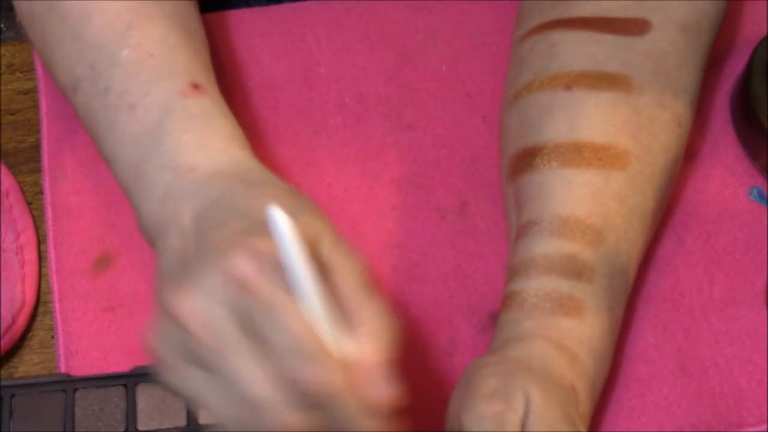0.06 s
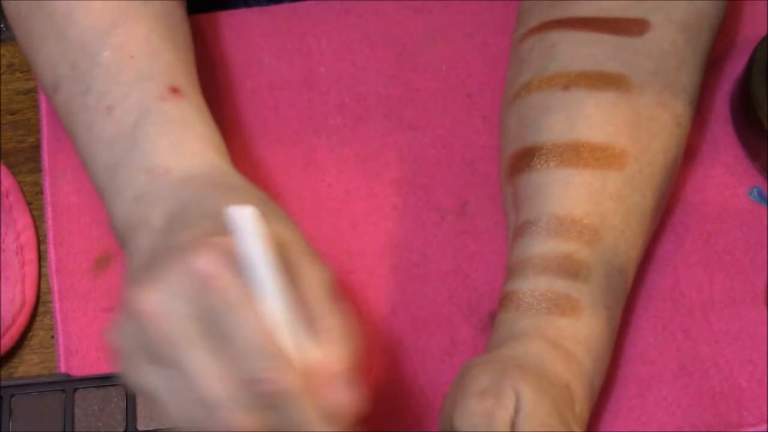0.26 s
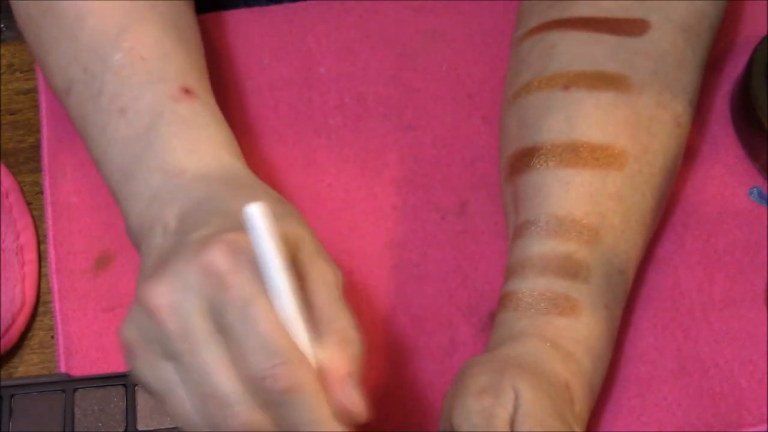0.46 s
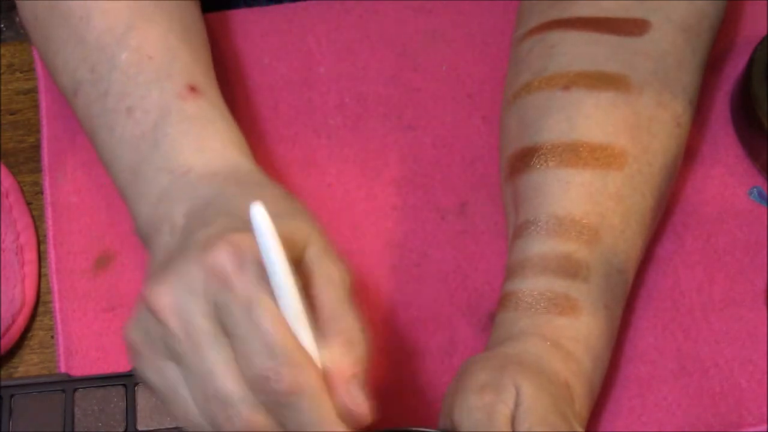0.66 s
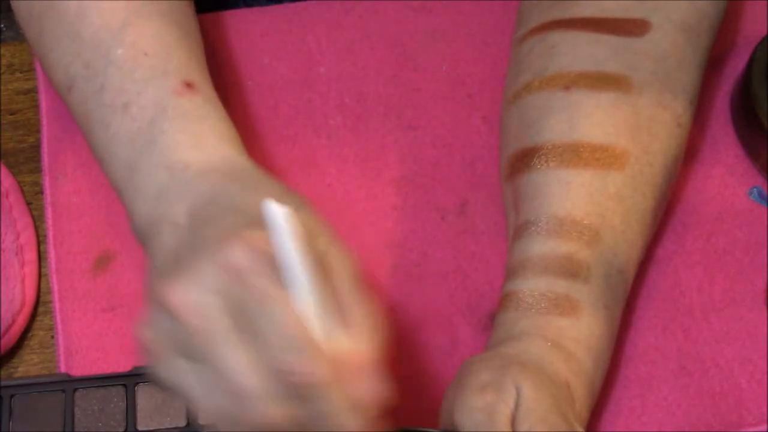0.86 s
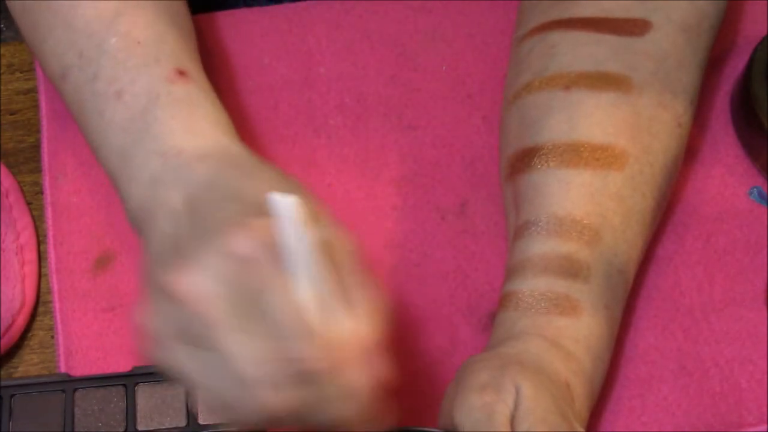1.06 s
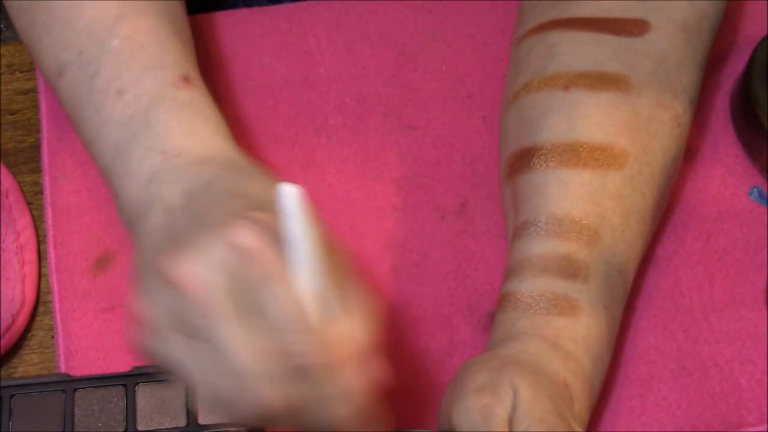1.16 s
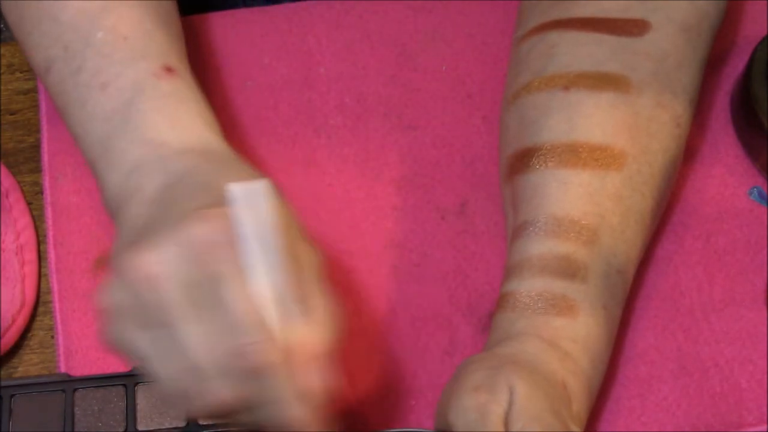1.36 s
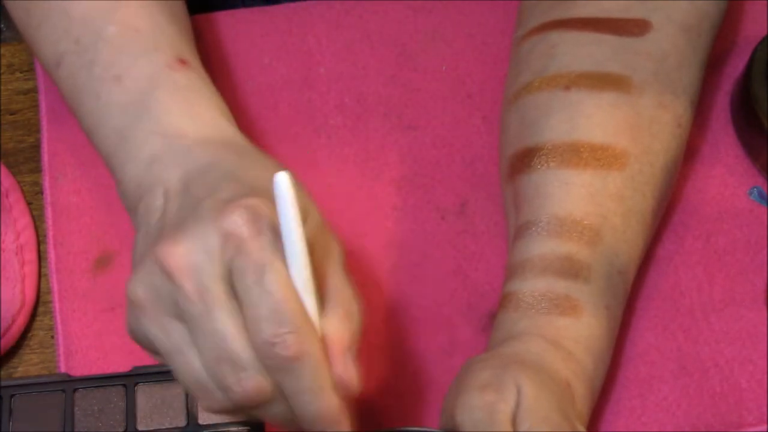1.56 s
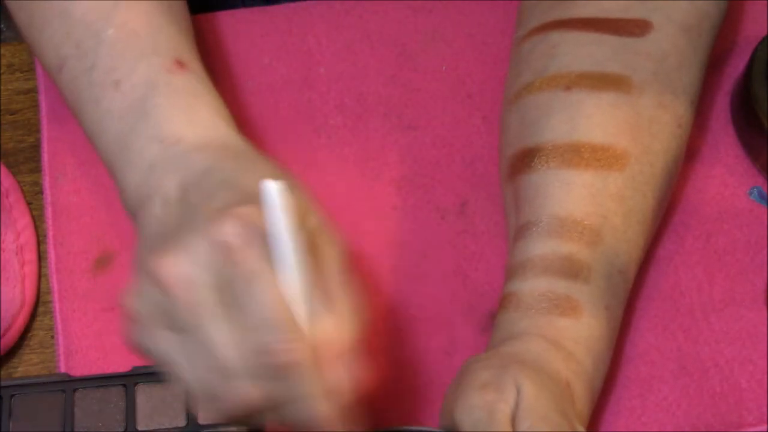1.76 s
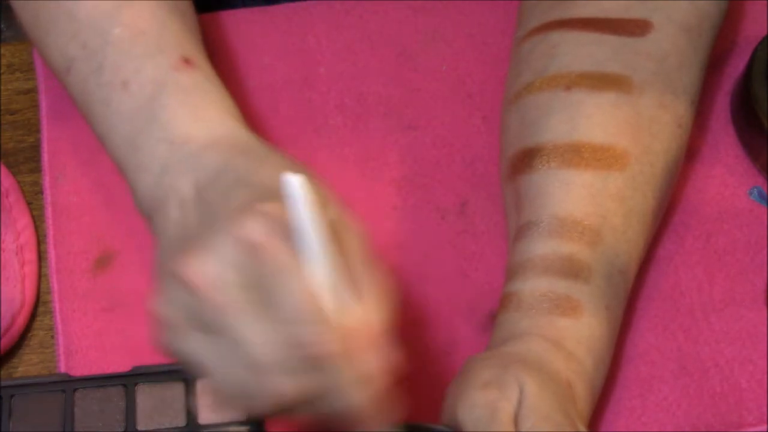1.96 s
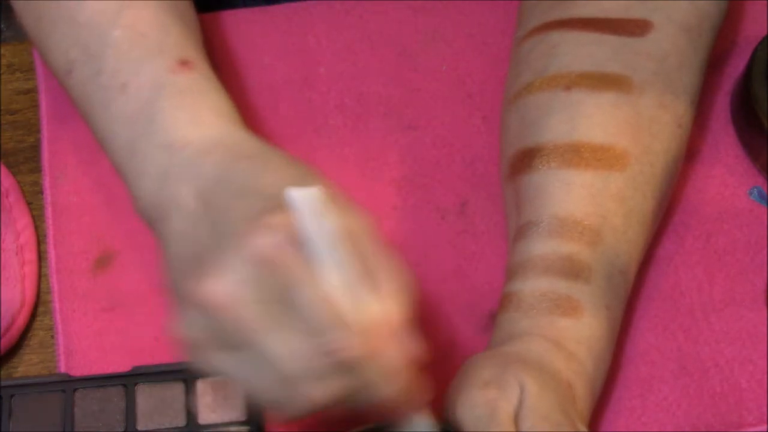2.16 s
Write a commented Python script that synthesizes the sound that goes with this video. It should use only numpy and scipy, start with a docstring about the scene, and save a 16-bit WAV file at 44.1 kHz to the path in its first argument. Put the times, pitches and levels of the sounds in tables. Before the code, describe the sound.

A small brush knocks a plastic palette with short, dry clacks: the tail of one at the start, a loud one at 0.2 seconds, a duller-bodied but bright one at 0.7, a faint tip tick at 1.1, then strong knocks at 1.3, 1.45 and 1.7, and a softer one at 1.9. Faint scratchy strokes rub felt about nine times a second over steady low motor hum and rushing air in a small room.

```python
"""Brush on a felt mat

In a small room a little brush sweeps to and fro over felt about nine times a second: clicks of slipping
bristles, a smooth rub and a hollow mat ring. Its handle knocks a plastic palette now and then (a noise crack
and damped modes, with echoes and a tail), its tip ticks once, lightly. Around it a motor hums in wavering
sine tones and air rushes as shaped noise. Mid and side signals make the stereo picture."""
import sys
import numpy as np
from scipy import signal
from scipy.fft import rfft, irfft
from scipy.io import wavfile
from scipy.ndimage import uniform_filter1d

SR = 44100
rng = np.random.default_rng(int(sys.argv[2]) if len(sys.argv) > 2 else 0)


def unload_audio(sound):
    """Save the sound as a 16-bit wav file, at the path given as the first command line argument."""
    columns = np.transpose(np.atleast_2d(sound))
    # keep every value between -1 and 1, then stretch to whole-number steps
    steps = np.round(np.clip(columns, -1, 1) * 32767)
    wavfile.write(sys.argv[1], SR, steps.astype(np.int16))


def level_to_linear(level):
    """Convert decibel levels to linear amplitude factors, elementwise."""
    exponent = np.asarray(level, float) / 20
    return 10 ** exponent


N = 97020  # length in samples

# Handle knocks on the palette. Each row: start in seconds, level in dB, then shifts in dB of the low, upper,
# bright and treble mode groups (treble also shifts the crack), contact in seconds.
KNOCKS = [(-.022, -16.5, 3, -4, -11, -11, 0.0023), (0.2204, -9, -1, 2.5, -4, 2, 0.0026),
          (.675, -12.5, 4.5, -3, 6.5, 2.5, .0018), (1.3297, -10.5, 1, 3.5, 4.5, 3, 0.002),
          (1.4491, -9.5, -7, -1.5, -3, -3, 0.00104), (1.6755, -10.5, -13, -1.5, -5, 1, 0.00179),
          (1.8991, -21, -5.5, -3, -12, -7, 0.0013), (1.0055, -50, -6, -3, -2, 13, .0005),
          (1.1085, -45, 1, -5, -4, 0, .0005)]
# Borders in Hz between the low, unshifted, upper, bright and treble mode groups.
MODE_GROUP_EDGES = [1700, 3400, 5000, 6200]
# Modes of the plastic palette. Each row: nominal frequency in Hz, relative level in dB, 60 dB decay in seconds.
PALETTE_MODES = [(883, -12.5, 0.0059), (1274, 1, 0.0048), (1500, -9, 0.0066), (2155, -1.5, 0.0059),
                 (2740, -3.5, 0.0057), (3094, -15, 0.032), (3510, -9.5, 0.0034), (4122, -5.5, 0.01),
                 (4560, -3, 0.0094), (5444, -5, .012), (6880, -10, 0.0017), (7170, -13, 0.015),
                 (8770, -14, 0.013), (9610, -11.5, 0.015), (10700, -8.5, 0.0052), (12570, -10.5, 0.0041),
                 (14590, -21, 0.0032)]
# Reflections from near surfaces. Each row: delay in seconds, level in dB.
NEAR_ECHOES = [(.0073, -18), (.0102, -18), (.0128, -26.5), (0.0186, -24)]
# Reverberation of the small room. Each row: frequency in Hz, 60 dB decay in seconds.
ROOM_DECAY = [(500, 0.26), (1300, 0.14), (3500, 0.18), (6000, 0.17), (9000, 0.14), (15000, 0.13)]
# Brush strokes. Each row: time of full speed in seconds, level in dB, length in seconds.
BRUSH_STROKES = [(-.01, -48.5, 0.095), (0.092, -45.5, 0.073), (0.236, -46.5, .1), (0.319, -44.5, 0.071),
                 (0.439, -50, 0.062), (.54, -46, 0.073), (0.658, -50.5, 0.073), (0.761, -48, 0.077),
                 (0.883, -48.5, 0.097), (.985, -46, 0.071), (1.088, -50.5, 0.096), (1.214, -48.5, .13),
                 (1.337, -52.5, 0.093), (1.45, -45.5, 0.11), (1.561, -52, 0.055), (1.684, -46, 0.11),
                 (1.778, -48.5, 0.064), (1.878, -48.5, 0.078), (1.988, -51, 0.085), (2.095, -46, 0.071),
                 (2.21, -50.5, 0.062)]
# Spectrum of bristles on felt. Each row: frequency in Hz, relative density in dB per Hz.
BRISTLE_SPECTRUM = [(500, -16.5), (900, -12), (1200, -2.5), (1450, -7), (1750, -8.5), (2300, -13.5),
                    (3000, -10), (4500, -16), (6200, -17), (7400, -13), (9200, -13.5), (10000, -19),
                    (12500, -20), (15000, -28), (17000, -37)]
# Spectrum of the rushing air. Each row: frequency in Hz, relative density in dB per Hz.
AIR_SPECTRUM = [(30, -45), (55, -29), (80, -15.5), (105, -5), (150, 3), (220, 1), (330, -7), (400, -3.5),
                (500, -6.5), (720, -3), (950, -12), (1400, -13.5), (2000, -19), (3000, -25.5),
                (4500, -27.5), (7000, -32), (10000, -34.5), (13000, -40), (16000, -53)]
# Width of the air. Each row: frequency in Hz, side level against mid in dB.
AIR_WIDTH = [(60, -12), (130, -33), (300, -14), (1300, -16), (3000, -9), (5500, -10.5), (7000, -23),
             (15000, -36)]
# Motor tones, the first two beating. Each row: frequency in Hz, rms level in dB, start phase in turns,
# rms waver in dB.
MOTOR_TONES = [(120, -46.3, 0., .6), (132.47, -54, .5, 1.5), (217, -58, 0., 3.), (240, -58, 0., 2.5),
               (399, -60, 0., 3.)]
# Spectrum of the knock's crack. Each row: frequency in Hz, relative density in dB per Hz.
CRACK_SPECTRUM = [(300, -18), (800, -20), (2000, 0), (5000, -3.5), (9000, -11), (15000, -29.5)]
# Light ticks of the brush tip. Each row: start in seconds, level in dB, frequency in Hz, 60 dB decay in seconds.
TIP_TICKS = [(1.108, -24, 1500, 0.021)]
# Colour of the side signal in the room. Each row: frequency in Hz, gain in dB.
ROOM_SIDE_COLOUR = [(500, 0), (1500, -6), (4500, 1), (8000, 1.5), (12000, 1), (16000, -8)]
# Colour of sound reflected by the walls. Each row: frequency in Hz, gain in dB.
WALL_COLOUR = [(800, 0), (1500, -2.5), (2500, 1), (3600, -4.5), (4600, 0), (5600, -1.5), (6500, -8.5),
               (10000, -6), (15000, -13)]
# Share of the mid that leans to the right. Each row: frequency in Hz, gain in dB.
LEAN_TO_RIGHT = [(200, -36), (5000, -36), (8000, -60)]

ROOM_DB, ROOM_START_S, ROOM_SIDE_DB = -12, 0.004, -15.5  # side is relative to the mid tail
SPREAD_T60_S = 0.006  # fading of the burst that feeds the tail
RISE_CYCLES, HELD_BELOW_HZ = 0.83, 3440  # modes under this frequency are driven for the whole contact
DETUNE = 0.014  # random spread of the palette modes, as a share of their frequency
CRACK_DB, CRACK_T60_S, TAP_SIDE_DB = -2, 0.008, -23.5
RISE_SHARE = 0.63  # part of a stroke spent speeding up
SLIPS_PER_S, SLIP_SPREAD_DB, RUB_DB = 2500, 4.5, -0.5
RUB_ROOM_DB, RUB_SIDE_DB = -10.5, -34
SCUFF_HZ, SCUFF_WIDTH_HZ, SCUFF_DB, SCUFFS_PER_S = 1426, 390, -2.5, 500
AIR_DB, PATCH_DB = -46.5, 0.5  # patches: rms drift of level


def evened(x):
    """Scales to rms 1."""
    return x / np.sqrt(np.mean(x ** 2) + 1e-20)


def read(points, hz):
    """Reads a table on a log-frequency axis."""
    f, value = np.transpose(points)
    return np.interp(np.log(hz + 1), np.log(f + 1), value)


def coloured(x, points):
    """Filters x by a table of gains in dB over frequency."""
    gain = level_to_linear(read(points, np.fft.rfftfreq(len(x), 1 / SR)))
    return irfft(rfft(x) * gain, len(x))


def add(mix, s, sound):
    """Mixes a sound in at time s, which may lie before the start."""
    at = round(s * SR)
    sound = sound[max(-at, 0):]
    part = mix[max(at, 0):][:len(sound)]
    part += sound[:len(part)]


def room_tail():
    """Sparse reflections of random sign, each band dying at its own speed; scaled to energy 1."""
    taps = np.zeros(SR // 2)
    slots = np.arange(round(ROOM_START_S * SR), SR // 2 - 10, 10)
    signs = rng.choice([-1., 1.], SR)[:len(slots)]
    at = slots + rng.integers(0, 10, SR)[:len(slots)]
    taps[at] = signs
    hz, t, z = signal.stft(taps, SR, nperseg=128)
    decay = level_to_linear(-60 * t / read(ROOM_DECAY, hz)[:, None])
    tail = signal.istft(z * decay, SR, nperseg=128)[1]
    return tail / np.linalg.norm(tail)


def in_room(ring):
    """Direct sound with echoes and tail as mid and side; the tail is fed mostly by the first instant."""
    dull = coloured(ring, WALL_COLOUR)
    fade = level_to_linear(-60 * np.arange(len(dull)) / SR / SPREAD_T60_S)
    burst = evened(dull * fade) * np.std(ring)
    mid = level_to_linear(ROOM_DB) * signal.fftconvolve(burst, room_tail())
    add(mid, 0, ring)
    for delay_s, echo_db in NEAR_ECHOES:
        add(mid, delay_s, level_to_linear(echo_db) * dull)
    side = level_to_linear(ROOM_DB + ROOM_SIDE_DB) * signal.fftconvolve(burst, room_tail())
    add(side, 0.0001, level_to_linear(TAP_SIDE_DB) * ring)
    return mid, coloured(side, ROOM_SIDE_COLOUR)


def tap(level_db, low_db, upper_db, bright_db, treble_db, contact_s):
    """A crack, and modes driven while the handle touches (low ones longest) that then die away."""
    t = np.arange(2000) / SR
    hz, db, t60 = np.transpose(PALETTE_MODES)[:, :, None]
    group_db = np.array([low_db, 0, upper_db, bright_db, treble_db])
    db = db + group_db[np.searchsorted(MODE_GROUP_EDGES, hz)]
    held_s = contact_s * np.minimum(HELD_BELOW_HZ / hz, 1)
    free = np.maximum(t - held_s, 0)  # time since the mode was let go
    detuned_hz = hz * (1 + DETUNE * rng.standard_normal(hz.shape))
    turns = detuned_hz * t + rng.random(hz.shape)
    rise = np.sin(np.pi / 2 * np.minimum(t * hz / RISE_CYCLES, 1)) ** 2
    modes = (rise * level_to_linear(db - 60 * free / t60) * np.sin(2 * np.pi * turns)).sum(0)
    crack = evened(coloured(rng.standard_normal(len(t)), CRACK_SPECTRUM))
    crack_free = np.maximum(t - contact_s * 0.54, 0)
    ring = modes + crack * level_to_linear(CRACK_DB + treble_db - 60 * crack_free / CRACK_T60_S)
    ring = signal.sosfilt(signal.butter(3, 550, "high", fs=SR, output="sos"), ring)
    loudness = np.sqrt(np.sum(ring ** 2) / (0.004 * SR))  # energy as rms over 4 ms
    return in_room(level_to_linear(level_db) * ring / loudness)


def scuff():
    """Sparse catches of the brush ring the mat's hollow resonance."""
    catches = rng.standard_normal(N) * (rng.random(N) < SCUFFS_PER_S / SR)
    b, a = signal.iirpeak(SCUFF_HZ, SCUFF_HZ / SCUFF_WIDTH_HZ, SR)
    ring = signal.lfilter(b, a, signal.lfilter(b, a, catches))  # resonator run twice
    return level_to_linear(SCUFF_DB) * evened(ring)


def brush():
    """Bristles slip in tiny uneven clicks over a smooth rub, swelling with each stroke."""
    t, speed = np.arange(N) / SR, np.zeros(N)
    for s, level_db, length in BRUSH_STROKES:
        half = length * np.where(t < s, RISE_SHARE, 1 - RISE_SHARE)
        speed += level_to_linear(level_db) * np.exp(-2 * ((t - s) / half) ** 2)
    size = level_to_linear(SLIP_SPREAD_DB * np.minimum(rng.exponential(1, N), 5)) * rng.choice([-1, 1], N)
    slips = evened(size * (rng.random(N) < SLIPS_PER_S / SR))
    rub = level_to_linear(RUB_DB) * rng.standard_normal(N)
    close = speed * (evened(coloured(slips + rub, BRISTLE_SPECTRUM)) + scuff())
    mid_room, side_room = [signal.fftconvolve(close, room_tail())[:N] for _ in range(2)]
    side = level_to_linear(RUB_SIDE_DB) * coloured(side_room, ROOM_SIDE_COLOUR)
    return np.array([close + level_to_linear(RUB_ROOM_DB) * mid_room, side])


def air():
    """Rushing air: random short-time spectra with drifting patches, as mid and side."""
    frames, hz = N // 256 + 5, np.fft.rfftfreq(1024, 1 / SR)
    a, b, c, d, patches = rng.standard_normal((frames, 513, 5)).T
    patches = uniform_filter1d(patches, size=8, axis=0)  # smooth over frequency
    patches = evened(uniform_filter1d(patches, size=12, axis=1))  # smooth over time
    width = level_to_linear(read(AIR_WIDTH, hz))[:, None]
    z = np.array([a + 1j * b, (c + 1j * d) * width])
    z *= level_to_linear(read(AIR_SPECTRUM, hz)[:, None] + PATCH_DB * patches)
    out = signal.istft(z, nperseg=1024, noverlap=768)[1][:, :N]
    return level_to_linear(AIR_DB) * out / np.std(out[0])


def hum():
    """Motor hum: sine tones of fixed pitch whose level wavers slowly."""
    t, out = np.arange(N) / SR, np.zeros(N)
    for hz, db, turns, waver_db in MOTOR_TONES:
        rates_hz = np.geomspace(0.5, 8, num=12)
        waver = evened(sum(np.sin(2 * np.pi * (f * t + rng.random())) for f in rates_hz))
        tone = np.sqrt(2) * np.sin(2 * np.pi * (hz * t + turns))
        out += level_to_linear(db + waver_db * waver) * tone
    return out


def tick(level_db, hz, t60):
    """The brush tip sounds one damped mode with a soft start."""
    t = np.arange(2000) / SR
    onset = np.minimum(t / 0.0018, 1)
    return in_room(onset * level_to_linear(level_db - 60 * t / t60) * np.sin(2 * np.pi * hz * t))


def scene():
    """Sums everything as mid and side, then left and right."""
    mid, side = brush() + air()
    mid = mid + hum()
    events = [(tap, row) for row in KNOCKS] + [(tick, row) for row in TIP_TICKS]
    for source, (s, *settings) in events:
        event_mid, event_side = source(*settings)
        add(mid, s, event_mid)
        add(side, s, event_side)
    side = side - coloured(mid, LEAN_TO_RIGHT)
    return np.array([mid + side, mid - side])


def top_cut(x):
    """Nothing passes above the cut-off."""
    return signal.sosfilt(signal.butter(12, 16860, fs=SR, output="sos"), x)


def record(dry):
    """Soft overload at full scale rounds off the loudest peaks."""
    mix = dry / (1 + np.abs(dry) ** 10) ** (1 / 10)
    return top_cut(mix)


dry = scene()
out = record(dry)
unload_audio(out)
```